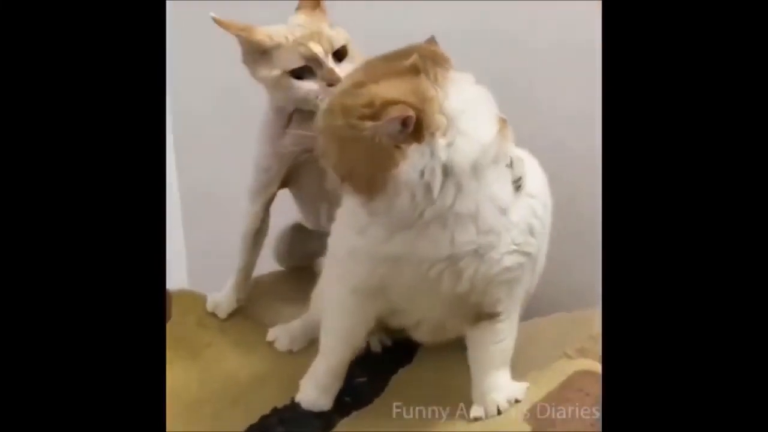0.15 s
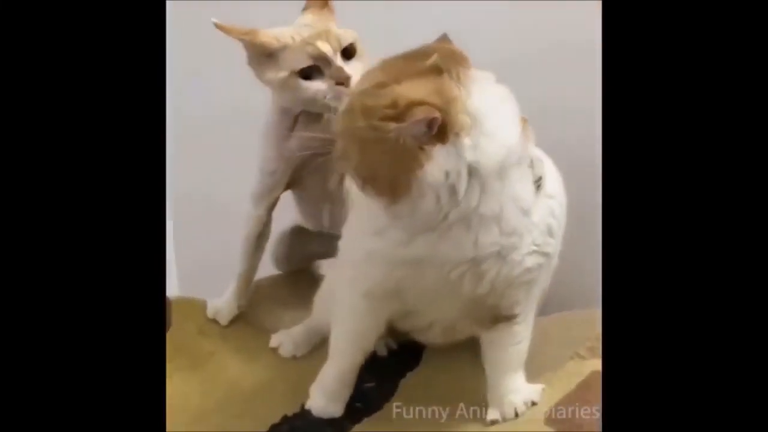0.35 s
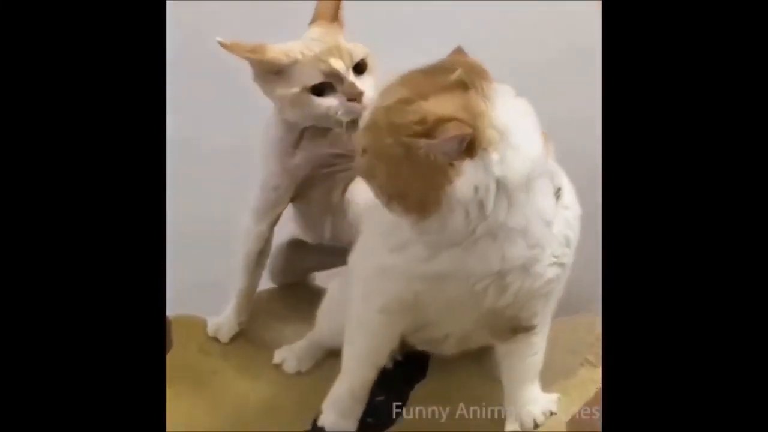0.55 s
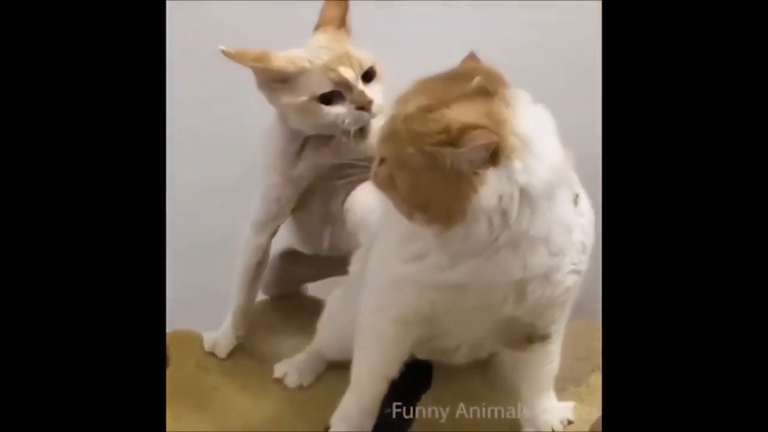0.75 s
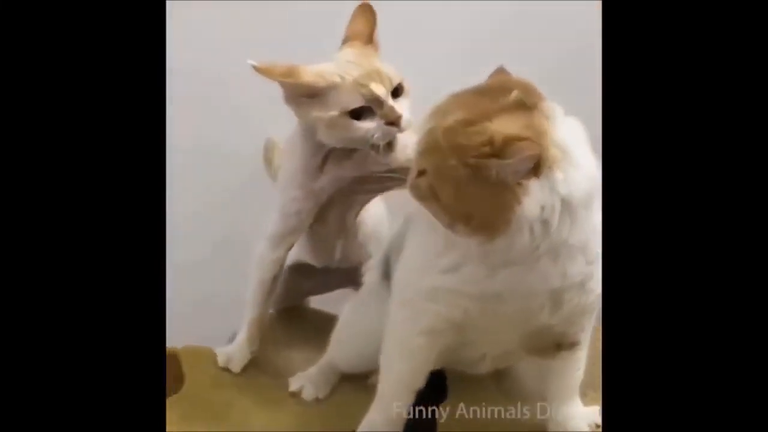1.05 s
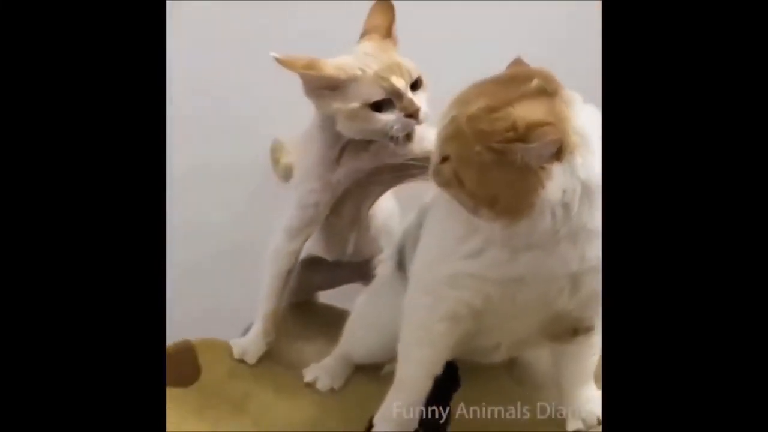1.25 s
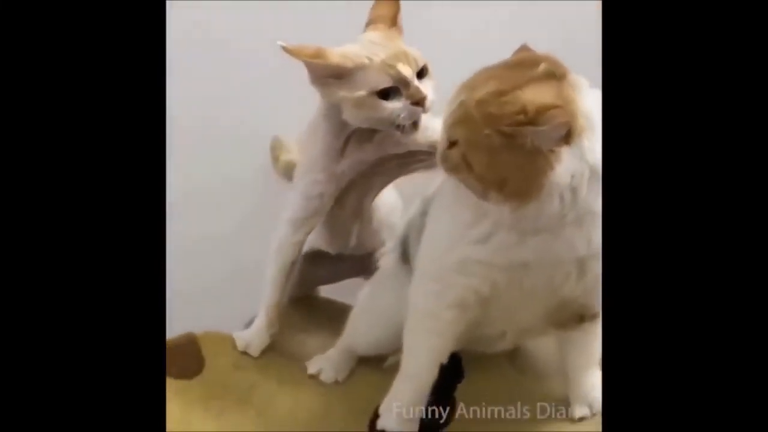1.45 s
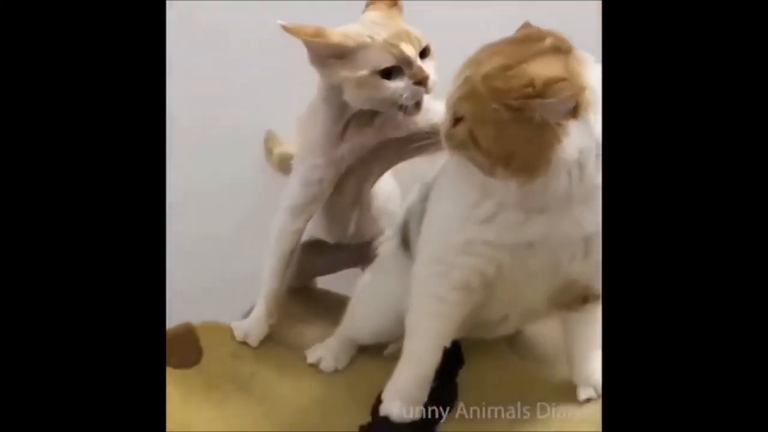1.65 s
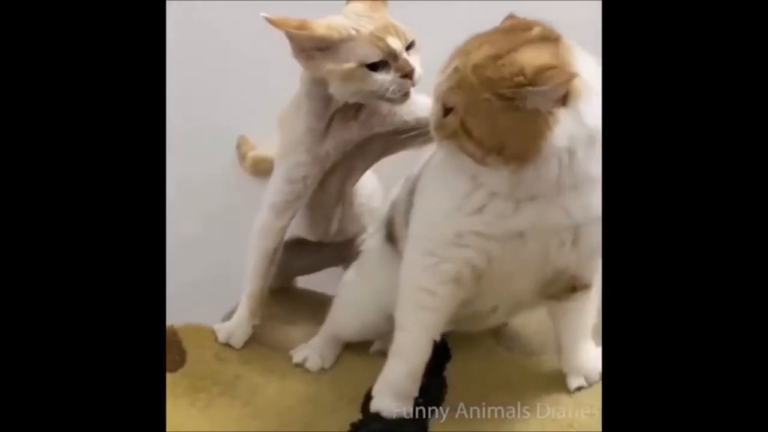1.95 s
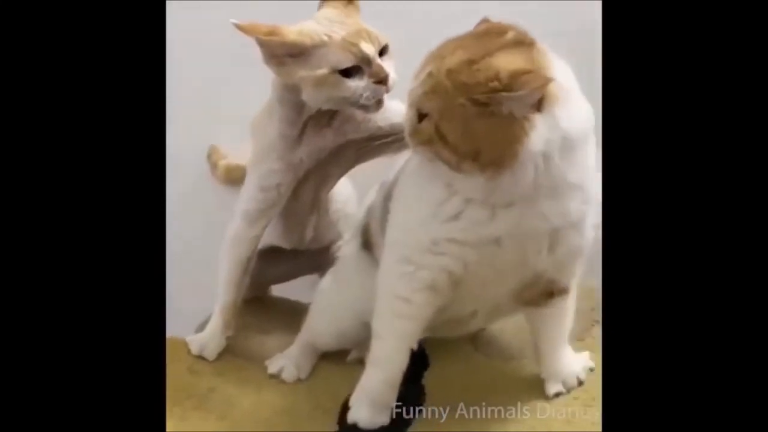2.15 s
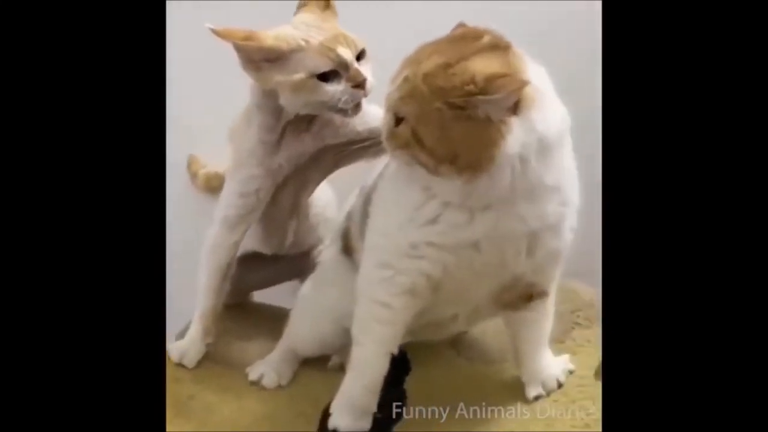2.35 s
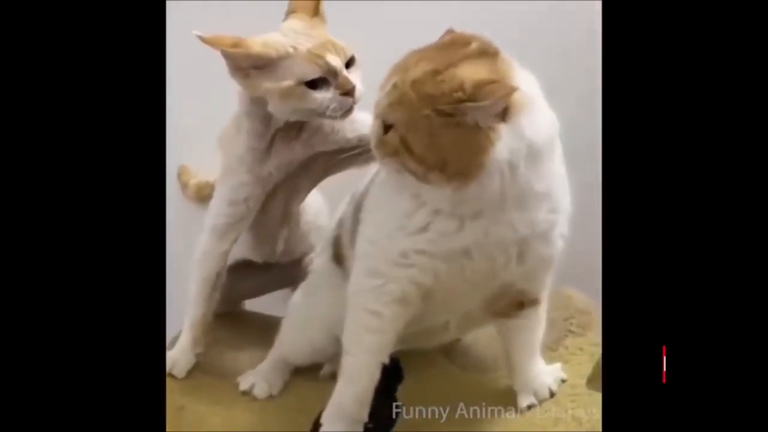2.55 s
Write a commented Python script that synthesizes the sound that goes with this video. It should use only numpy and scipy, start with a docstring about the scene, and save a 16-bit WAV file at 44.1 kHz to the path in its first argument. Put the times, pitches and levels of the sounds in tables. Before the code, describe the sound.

A cat yowls one long, strained, slightly hoarse note close by in a small bare room

```python
"""Cat yowl in a bare room

A cat close by in a small bare room, a little left of a stereo pair, sings one note that dips, climbs and sags.
Twenty partials ride one pitch; each treble partial swells and fades on its own, as close walls make it.
Breath is noise pulsed once a cycle and coloured by the throat; sharp resonances and dying noise echo it.
Behind it: a faint patchy sizzle, a soft rustle at the start, and a low room hum with one soft bump."""
import sys
import numpy as np
from scipy import signal
from scipy.fft import rfft, irfft, next_fast_len
from scipy.io import wavfile
from scipy.ndimage import uniform_filter1d, map_coordinates

SR = 44100
rng = np.random.default_rng(int(sys.argv[2]) if len(sys.argv) > 2 else 0)


def transcribe(signal):
    """Save signal, clipped to [-1, 1], as a 16-bit WAV file at the path in sys.argv[1]."""
    frames = np.atleast_2d(signal).T
    limited = np.clip(frames, -1, 1)
    pcm = np.round(limited * 32767).astype(np.int16)
    wavfile.write(sys.argv[1], SR, pcm)


N = 119070
T = np.arange(N) / SR  # seconds
ONSET_S, ATTACK_S = 0.239, 0.01


def amp(db):
    """dB to gain."""
    return 10 ** (np.asarray(db) / 20)


def unit(x):
    """Scaled to rms 1."""
    return x / np.sqrt(np.mean(x ** 2) + 1e-20)


def along(points, hz):
    """Value at hz from (Hz, value) points joined on a log frequency axis."""
    f, v = np.transpose(points)
    return np.interp(np.log(hz + 1), np.log(f + 1), v)


def curves(rows):
    """One value per sample for each column after the time."""
    s, *cols = np.transpose(rows)
    return [np.interp(T, s, c) for c in cols]


def wobble(rate):
    """A smooth random curve, rate knots a second."""
    knots = rng.standard_normal(int(N * abs(rate) / SR) + 4)
    return map_coordinates(knots, [T * abs(rate)])


def since_onset(length_s):
    """Straight rise from 0 to 1 over length_s after the cry starts."""
    return np.clip((T - ONSET_S) / length_s, 0, 1)


def filtered(x, response):
    """x times a response of frequency."""
    m = next_fast_len(N + SR // 2)
    return irfft(rfft(x, m) * response(np.fft.rfftfreq(m, 1 / SR)), m)[..., :N]


def coloured(x, colour):
    """x shaped by a table of (Hz, dB)."""
    return filtered(x, lambda hz: amp(along(colour, hz)))


# Breath pressed through the throat: start_s, level_db, roughness (no unit; about 1 is very rough)
BREATH_ROWS = [(.24, -64, 0.05), (.3, -70.5, 0.7), (.45, -50, 0.9), (.56, -47.5, 1.17), (.72, -47, 0.8),
               (.8, -56.5, 0.51), (1.3, -61, 0.34), (1.6, -60, 0.49), (1.8, -56.5, 0.37), (2.0, -53, 0.32),
               (2.15, -55.5, 0.58), (2.3, -44.5, .9), (2.5, -53, 1.2), (2.7, -51, 0.3)]


def yowl():
    """The whole cry: voiced partials plus three kinds of breath, all opening with one short attack."""
    breath_db, rough = curves(BREATH_ROWS)
    pitch_hz = sung_pitch(rough)
    phase = 2 * np.pi * np.cumsum(pitch_hz) / SR
    cry = partials(pitch_hz, phase, rough) + throat_breath(breath_db, phase)
    cry = cry + hoarse_breath(phase) + treble_hiss(phase)
    return since_onset(ATTACK_S) * cry


# Course of the sung note: start_s, pitch_hz
PITCH_ROWS = [(.24, 603), (.258, 597), (.275, 547.5), (.33, 552.3), (.36, 588.5), (.4, 618.2), (.44, 648.8),
              (.5, 651.8), (.65, 659.7), (.8, 651.7), (.95, 660), (1.1, 657.6), (1.25, 658), (1.5, 642.5),
              (1.75, 638.5), (2.0, 625), (2.25, 616.3), (2.45, 613.8), (2.7, 609.9)]
TREMOR_HZ, JITTER_HZ = 1, 3.8  # slow pitch scatter; fast pitch scatter at roughness 1


def sung_pitch(rough):
    """The note's course, smoothed, with slow tremor and a fast jitter that grows with roughness."""
    course_hz = uniform_filter1d(curves(PITCH_ROWS)[0], size=500)
    return course_hz + TREMOR_HZ * wobble(25.03) + JITTER_HZ * rough * wobble(130)


# Partials of the cry: start_s, first_db, third_db, fourth_db, treble_db (shared from the fifth up)
PARTIAL_ROWS = [(0.23, -45.5, -66, -101, -100.5), (0.28, -43.5, -60.5, -64.5, -68),
                (0.33, -32.5, -68.5, -81.5, -65), (0.35, -35.5, -52, -74, -64.5),
                (0.44, -29, -32.5, -52.5, -52), (0.51, -42, -26.5, -51, -54.5),
                (0.55, -44, -40.5, -47.5, -49), (0.6, -35.5, -35, -40, -50), (0.75, -36, -44, -65.5, -42),
                (0.86, -37, -41, -43, -42), (1.03, -44.5, -53.5, -34, -46.5),
                (1.22, -43, -42.5, -39.5, -45.5), (1.33, -35.5, -48.5, -36, -46.5),
                (1.52, -34, -45, -39, -47.5), (1.6, -44.5, -42.5, -60.5, -50), (1.64, -37, -51, -48.5, -49),
                (1.83, -47.5, -46, -38.5, -49), (1.88, -48, -56, -39, -48.5),
                (1.99, -30.5, -46, -35.5, -52), (2.16, -34, -62.5, -42, -55), (2.22, -34, -46.5, -37, -51),
                (2.45, -35, -53, -38, -50.5), (2.67, -32.5, -57, -51, -60.5)]
# The second partial, the loudest: start_s, level_db
SECOND_ROWS = [(0.23, -69), (0.28, -40), (0.33, -46.5), (0.42, -27), (0.54, -31.5), (0.56, -20.5),
               (0.69, -25), (0.75, -32), (0.8, -23), (0.91, -18.5), (0.93, -34), (0.97, -21), (1.0, -31),
               (1.05, -26), (1.13, -39.5), (1.18, -23), (1.26, -38.5), (1.34, -23.5), (1.38, -32.5),
               (1.43, -26), (1.53, -32), (1.59, -26.5), (1.62, -31), (1.79, -29.5), (1.9, -34.5),
               (1.93, -27.5), (1.96, -31), (1.99, -56), (2.01, -37.5), (2.1, -50), (2.14, -39),
               (2.17, -51.5), (2.22, -33.5), (2.26, -48), (2.3, -32.5), (2.33, -43), (2.36, -33.5),
               (2.4, -35.5), (2.42, -39), (2.45, -34.5), (2.48, -32), (2.5, -48), (2.57, -36.5),
               (2.62, -41)]
# Balance of the partials from the fifth up, before a common cut of 4.5 dB: frequency_hz, level_db
TREBLE_COLOUR = [(2900, -6.5), (3320, -12.5), (3670, -19), (4200, -11), (5290, -0.5), (7000, -22.5),
                 (7750, -12), (8370, -59.5), (11700, -35.5), (13300, -30.5)]
# Partials from the eleventh up: start_s, level_db added to the treble
TOP_ROWS = [(.3, -20.5), (.9, -15.5), (1.3, -1), (1.9, -5), (2.2, -3)]
# Rasp on partials two to four (the first gets 0.45 of its gain): start_s, level_db at roughness 1
LOW_RASP_ROWS = [(.7, -7.5), (1.0, -7)]
LOW_RASP_RATE, RASP_RATE = 59.65, 261.8  # random knots a second: a higher rate spreads the noise wider
RASP_DB = -6.5  # treble rasp against its partial, at roughness 1
SHIMMER_DB, FADE_DB = 2, 3  # fast unsteadiness; slow swell and fade of each treble partial
CLEAR_S = .22  # the pure tone of the treble partials takes this long to clear up


def partials(pitch_hz, phase, rough):
    """Harmonics of one pitch; random modulation in level and phase spreads noise around each."""
    first_db, third_db, fourth_db, treble_db = curves(PARTIAL_ROWS)
    second_db, = curves(SECOND_ROWS)
    low_db = [first_db, second_db, third_db, fourth_db]
    top_db, = curves(TOP_ROWS)
    low_rasp_db, = curves(LOW_RASP_ROWS)
    flutter_db = SHIMMER_DB * rough * wobble(70)  # common to all but the first
    tone = np.zeros(N)
    for k in range(1, 21):
        if k < 5:
            db = low_db[k - 1] + (k > 2) * SHIMMER_DB * wobble(35.01)
            rasp_db, rasp_rate, clear = low_rasp_db, LOW_RASP_RATE, 1
        else:
            db = treble_db - 4.5 + along(TREBLE_COLOUR, k * pitch_hz) + FADE_DB * wobble(21.965)
            rasp_db, rasp_rate, clear = RASP_DB, RASP_RATE, since_onset(CLEAR_S) ** 2
        db = uniform_filter1d(db, size=250) + (k > 1) * flutter_db + (k > 10) * top_db
        rasp_gain = (1 if k > 1 else .45) * amp(rasp_db) * rough
        rasp = rasp_gain * (wobble(rasp_rate) + 1j * wobble(rasp_rate))
        turning = np.exp(1j * (k * phase + rng.uniform(0, 2 * np.pi)))
        tone += np.sqrt(2) * amp(db) * np.imag((clear + rasp) * turning)  # sqrt 2: levels are rms
    return tone


def pulsed_noise(phase):
    """White noise that swells once per cycle of the voice."""
    return rng.standard_normal(N) * (1 + 0.42 * np.sin(phase))


# Throat resonances: centre_hz, width_hz (where it is 12 dB down), level_db against the breath
THROAT_BANDS = [(636, 250, -12.5), (1145.4, 202, 1), (2424, 360, -7.5)]


def throat_breath(breath_db, phase):
    """Pulsed breath through each throat resonance, every band wavering by itself."""
    air = np.zeros(N)
    for centre_hz, width_hz, db in THROAT_BANDS:
        def resonance(hz):
            return 1 / (1 + ((hz - centre_hz) / (width_hz / 2)) ** 2) ** 2
        gain = amp(breath_db + db + 3.45 * wobble(12))
        air += gain * unit(filtered(pulsed_noise(phase), resonance))
    return air


# Broad hoarse breath: start_s, level_db
HOARSE_ROWS = [(.24, -85), (.36, -61.5), (.45, -55.5), (.55, -51.5), (.66, -52), (.75, -49.5), (.84, -64.5),
               (2.7, -76.5)]
# Its colour: frequency_hz, level_db per Hz (relative)
HOARSE_SHAPE = [(350, -41.5), (700, -6), (1600, -2), (2400, -7), (3100, -30.5), (6800, -61)]
HOARSE_WAVER_DB = 3.5


def hoarse_breath(phase):
    """Broad pulsed breath noise with an unsteady level."""
    gain = amp(curves(HOARSE_ROWS)[0] + HOARSE_WAVER_DB * wobble(30))
    return gain * unit(coloured(pulsed_noise(phase), HOARSE_SHAPE))


# Breath hiss between the treble partials: start_s, level_db
HISS_ROWS = [(.25, -90), (.27, -73), (.36, -72), (.52, -62), (.7, -66), (1.3, -73), (2.1, -79), (2.3, -66),
             (2.7, -77)]
# Its colour: frequency_hz, level_db per Hz (relative)
HISS_SHAPE = [(3000, -20), (4300, -15), (5600, 0), (6500, -4), (6900, -40)]
HISS_WAVER_DB = 4.5


def treble_hiss(phase):
    """Pulsed breath hiss, cut off at 7200 Hz, with an unsteady level."""
    gain = amp(curves(HISS_ROWS)[0] + HISS_WAVER_DB * wobble(18))
    hiss = filtered(pulsed_noise(phase), lambda hz: amp(along(HISS_SHAPE, hz)) * (hz < 7200))
    return gain * unit(hiss)


# Faint hiss on top: start_s, level_db
SIZZLE_ROWS = [(.3, -96), (.38, -66.5), (.7, -65.5), (1.2, -81.5), (1.9, -69.5), (2.7, -69.5)]
# Its colour: frequency_hz, level_db per Hz (relative)
SIZZLE_SHAPE = [(7500, -44.5), (8500, -4), (10200, -5), (12200, 1.5), (13300, -16)]


def sizzle():
    """Hiss above 7500 Hz whose time-frequency cells are scaled by a smooth random field, so it is patchy."""
    z = signal.stft(rng.standard_normal(N), nperseg=256)[2]
    field = uniform_filter1d(rng.standard_normal(z.shape), size=6, axis=0)
    field = unit(uniform_filter1d(field, size=30, axis=1))
    hiss = signal.istft(z * amp(11 * field), nperseg=256)[1][:N]
    hiss = filtered(hiss, lambda hz: amp(along(SIZZLE_SHAPE, hz)) * (hz > 7500))
    return amp(curves(SIZZLE_ROWS)[0]) * unit(hiss)


# Sharp room resonances: centre_hz, width_hz, level_db at the peak against the dry voice
ROOM_MODES = [(549, 4, 7), (1766, 8, 9)]


def room_ring(x):
    """Narrow resonances of the room, each ringing on after the voice excites it."""
    def response(hz):
        return sum(amp(db) * 1j * hz * width / (centre ** 2 - hz ** 2 + 1j * hz * width)
                   for centre, width, db in ROOM_MODES)
    return filtered(x, response)


# Level difference at the microphones: frequency_hz, left_over_right_db
LEFT_OVER_RIGHT = [(600, 5), (1300, 3), (2500, -0.6), (6000, -0.5)]
LEFT_LEAD_S, LEAD_TOP_HZ = 5e-5, 2500  # the phase lead stops growing above LEAD_TOP_HZ


def placed_left(x):
    """Direct sound a little to the left: level and phase differences split over both microphones."""
    half = np.array([[.5], [-.5]])

    def response(hz):
        lead = 2 * np.pi * np.minimum(hz, LEAD_TOP_HZ) * LEFT_LEAD_S * half
        return amp(along(LEFT_OVER_RIGHT, hz) * half) * np.exp(1j * lead)
    return filtered(x, response)


# Decay of the middle echo: frequency_hz, t60_s
WALL_DECAY = [(300, 1), (1500, 0.73), (5000, 1), (12000, 0.032)]
# Side echo: frequency_hz, level_db
SIDE_COLOUR = [(600, -10), (1300, -9), (2500, -17), (5000, -2), (12000, 1)]
ECHO_DB = -17  # middle echo
SIDE_T60_SHARE = 0.38  # the side echo dies sooner


def walls(x):
    """Echoes in middle and side from unrelated decaying noise; each frequency dies at its own speed."""
    hz, t, z = signal.stft(rng.standard_normal((2, SR // 2)), SR, nperseg=256)
    t60 = along(WALL_DECAY, hz)[:, None] * [[[1]], [[SIDE_T60_SHARE]]]
    tail = signal.istft(z * amp(-60 * t / t60), SR, nperseg=256)[1]
    tail = tail / np.linalg.norm(tail, axis=1)[:, None]
    late = np.pad(x, (200, 0))[None]  # 200 samples later than the voice
    mid, side = signal.fftconvolve(late, tail, axes=1)[:, :N]
    return amp(ECHO_DB) * mid + coloured(side, SIDE_COLOUR) * [[1], [-1]]


# Soft rustle dying away: start_s, level_db of the whole rustle, both sides together
RUSTLE_ROWS = [(0, -69.5), (.3, -73), (.8, -100)]
# Its colour: frequency_hz, level_db per Hz (relative)
RUSTLE_SHAPE = [(250, -18), (450, -4.5), (1100, -4.5), (1400, -12.5), (3500, -18), (5000, -40.5)]


def rustle():
    """Faint broad noise at the start, mostly shared by both sides."""
    shared, left, right = coloured(rng.standard_normal((3, N)), RUSTLE_SHAPE)
    return amp(curves(RUSTLE_ROWS)[0]) * unit(shared + 0.33 * np.array([left, right]))


# Colour of the room hum: frequency_hz, level_db per Hz (relative)
HUM_SHAPE = [(25, -21.5), (110, -12.5), (135, -4), (175, -16), (349, -12), (504, -25), (900, -28),
             (1290, -39.5), (2270, -39.5), (9000, -63), (11700, -96)]
# Course of the hum, before 3 dB is added: start_s, level_db
HUM_ROWS = [(0.0, -62), (0.68, -62.5), (1.3, -67.5), (2.38, -65), (2.65, -67)]
# Likeness of the left and right microphones: frequency_hz, likeness (1 is mono)
HUM_LIKENESS = [(60, 1), (300, 0.93), (3000, .5)]
HUM_WAVER_DB = 1.5
BUMP_S, BUMP_HZ, BUMP_LENGTH_S, BUMP_DB = .75, 52, .07, -58  # centre time, pitch, spread, peak


def hum():
    """Low coloured room noise, near mono in the bass, and one soft low bump."""
    def mid_side(hz):
        turn = np.arccos(np.clip(along(HUM_LIKENESS, hz), -1, 1)) / 2
        return amp(along(HUM_SHAPE, hz)) * [np.cos(turn), np.sin(turn)]
    mid, side = filtered(rng.standard_normal((2, N)), mid_side)
    gain = amp(curves(HUM_ROWS)[0] + 3.0 + HUM_WAVER_DB * wobble(4.7))
    swell = np.exp(-((T - BUMP_S) / BUMP_LENGTH_S) ** 2)
    bump = amp(BUMP_DB) * swell * np.sin(2 * np.pi * BUMP_HZ * T)
    return gain * unit(np.array([mid + side, mid - side])) + bump


def scene():
    """The voice and its sizzle, a little left, with the room's ring and echoes, then rustle and hum."""
    cat = yowl() + sizzle()
    near = placed_left(cat + room_ring(cat))
    return near + walls(cat) + rustle() + hum()


def record(dry):
    """Nothing is kept from 13400 Hz up."""
    return filtered(dry, lambda hz: hz < 13400)


dry = scene()
out = record(dry)
transcribe(out)
```